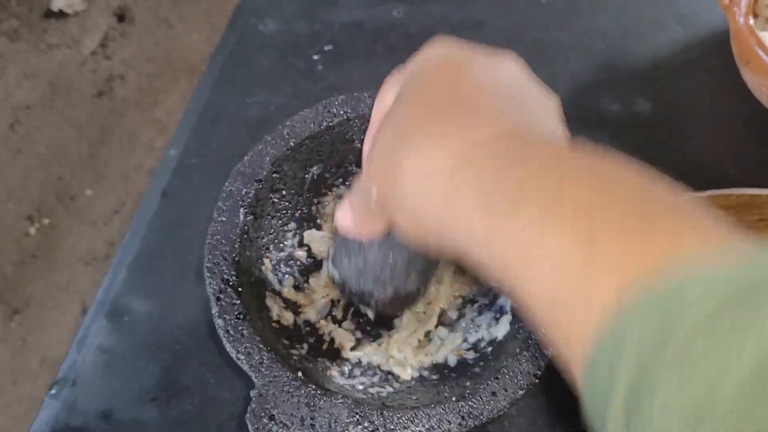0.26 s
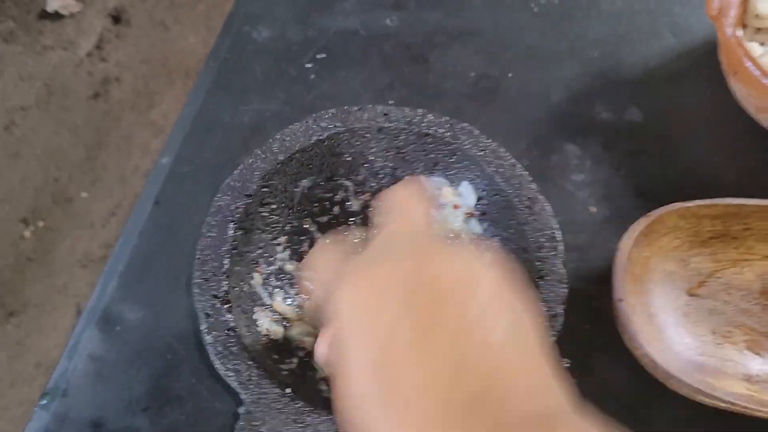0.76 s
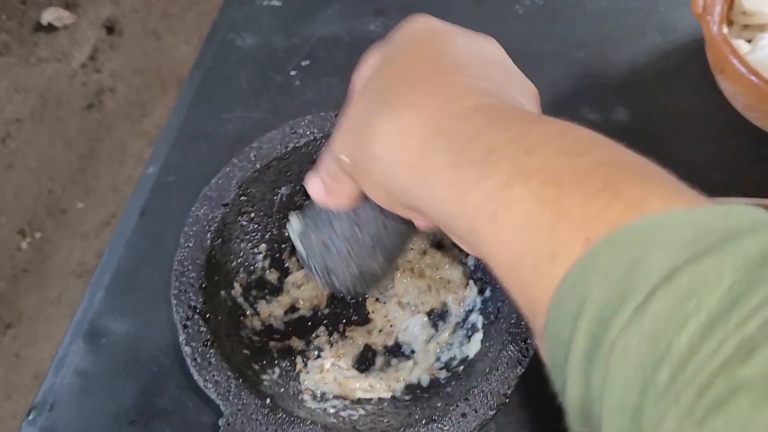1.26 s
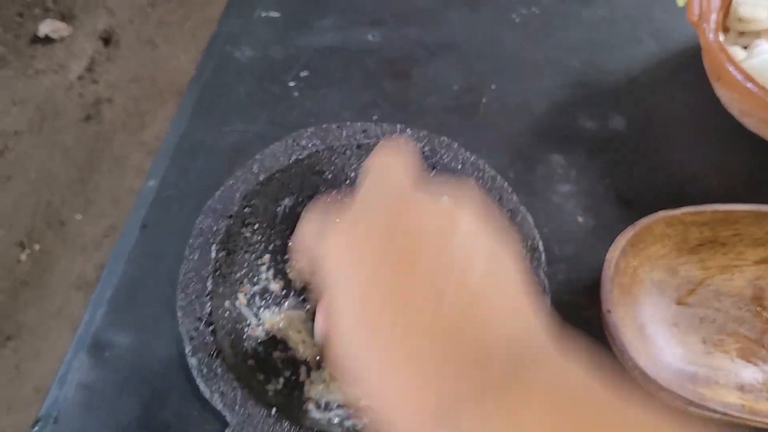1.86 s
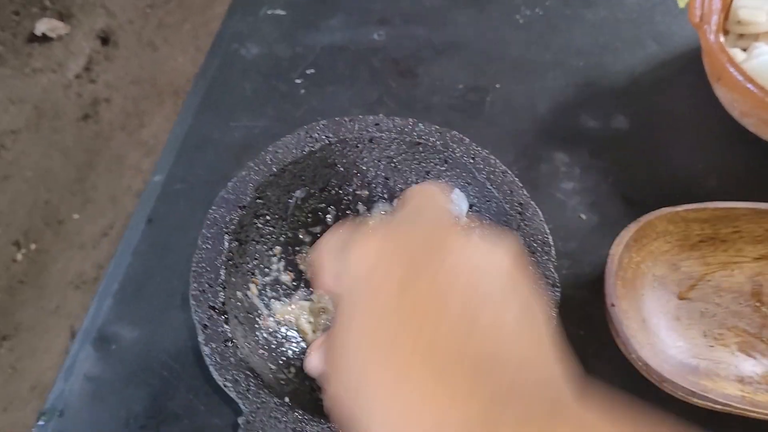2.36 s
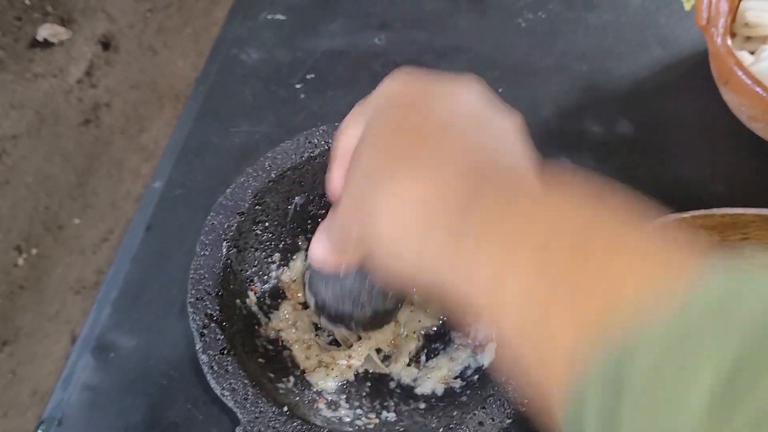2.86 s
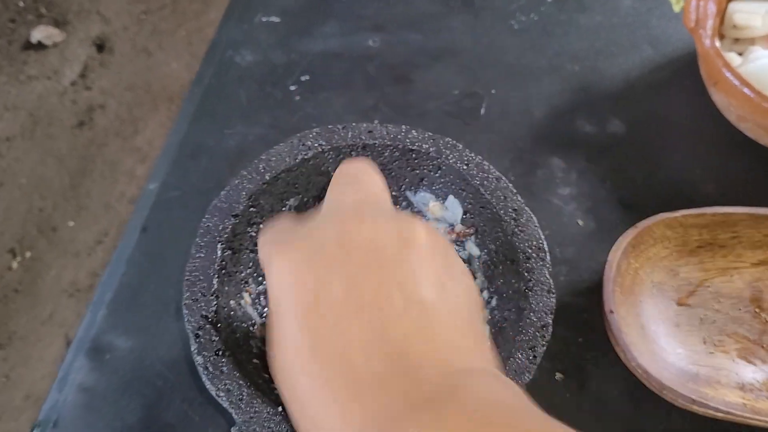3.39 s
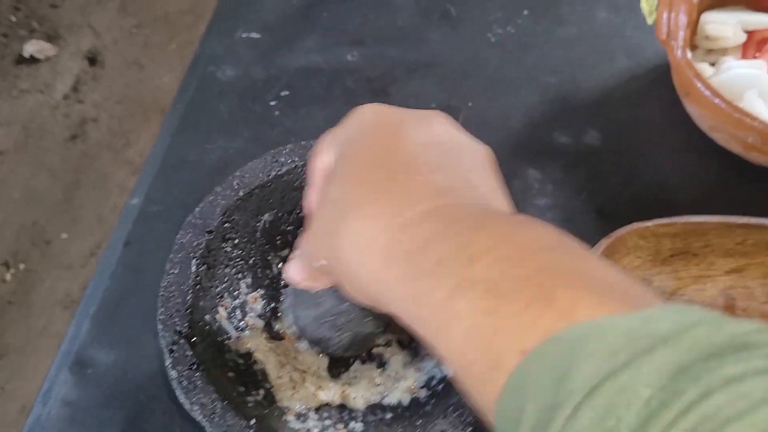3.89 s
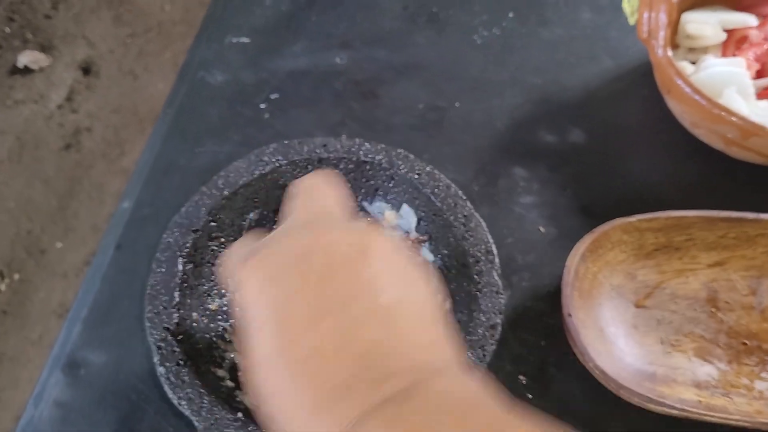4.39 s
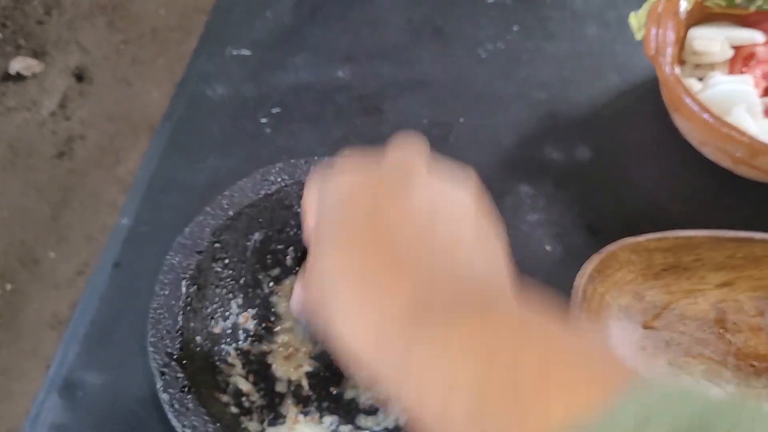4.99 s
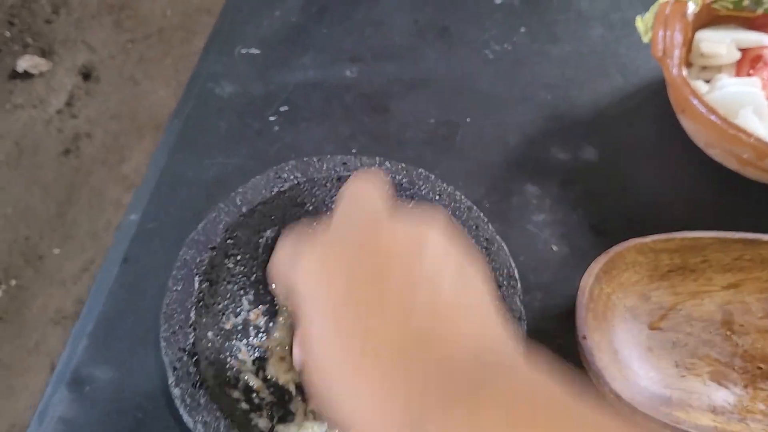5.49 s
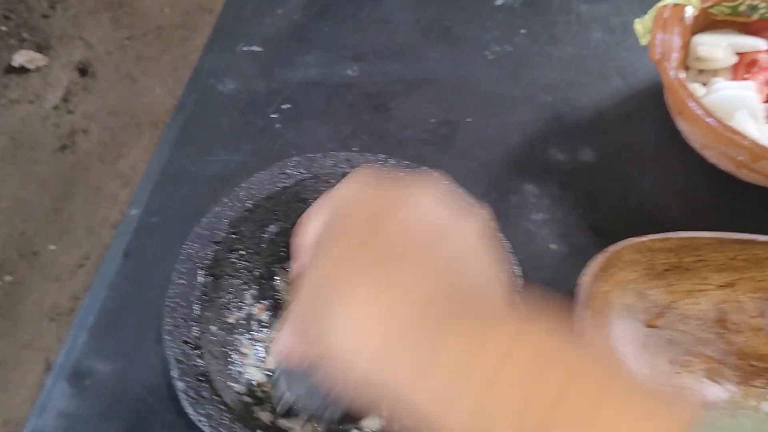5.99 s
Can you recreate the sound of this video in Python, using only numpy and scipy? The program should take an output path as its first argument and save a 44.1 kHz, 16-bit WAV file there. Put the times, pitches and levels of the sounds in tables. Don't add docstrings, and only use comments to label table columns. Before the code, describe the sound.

From 0 s a pestle drags lightly through wet paste, then lands hard at 0.1 with a hollow stone knock and table thump. Strokes continue every third of a second or so: knocks near 0.4, a soft one at 0.7, then 1.07, 1.35, 1.74 and 2.03, each followed by a short gritty rub that eases away. A strong blow at 2.4 thumps the table; more follow at 2.7, 3.06 and 3.4, with a duller push around 4.05, a firm knock at 4.35, others at 4.67, 5.0, 5.4 and 5.7, and a heavy one at 6.08. Small crunches and table rocking fill the gaps. Sticky smacks, crackles and tiny bright ticks accompany the strokes. Beneath lie soft low air, faint hiss and a continuous high cricket; a distant bird whistles faintly at 0.35, slides downward at 3.2, and again at 5.96. Close, dry stereo with a short tail.

```python
import sys
import numpy as np
from scipy import signal
from scipy.fft import rfft, irfft, next_fast_len
from scipy.io import wavfile
from scipy.ndimage import uniform_filter1d

SR = 44100
rng = np.random.default_rng(int(sys.argv[2]) if len(sys.argv) > 2 else 0)


def field_ratio(decibels):
    return 10 ** (np.asarray(decibels, dtype=float) / 20)


def log_audio(samples):
    frames = np.atleast_2d(samples).T
    limited = np.clip(frames, -1, 1)
    pcm = np.round(limited * 32767).astype(np.int16)
    wavfile.write(sys.argv[1], SR, pcm)


N = 275625


def evened(x):
    return x / np.sqrt(np.mean(x ** 2) + 1e-20)


def read(points, hz):
    f, value = np.transpose(points)
    return np.interp(np.log(hz + 1), np.log(f + 1), value)


def band(x, lo_hz, hi_hz, order=2):
    sos = signal.butter(order, [lo_hz, min(hi_hz, SR / 2.1)], "band", fs=SR, output="sos")
    return signal.sosfilt(sos, x)


def tilt(modes):
    return np.linspace(-1, 1, num=modes)[:, None]


# [f/Hz, level/dB per Hz]
AIR = [(15, -42.5), (25, 2), (128, -17), (178, -5), (331, -3.5), (698, -26.5), (1380, -26), (1730, -34.5),
       (3500, -54), (4550, -69), (7700, -120)]
# [f/Hz, level/dB per Hz]
HISS = [(1760, -30), (3000, 0), (8200, -5), (8870, -5), (14900, -8), (16200, -12), (16500, -39)]
# [f/Hz, likeness/1]
AIR_SAME = [(60, 0.75), (300, 0.83), (700, 0.72), (1400, 0.034), (16000, .01)]
AIR_DB, HISS_DB = -52.0, -75.5


def air(spectrum, level_db, patchy_db):
    frames, hz = N // 256 + 5, np.fft.rfftfreq(1024, 1 / SR)
    a, b, c, d, patches = rng.standard_normal((frames, 513, 5)).T
    patches = evened(uniform_filter1d(uniform_filter1d(patches, 12, 0), 14, 1))
    same = np.clip(read(AIR_SAME, hz), -1, 1)[:, None]
    left = a + 1j * b
    right = same * left + np.sqrt(1 - same ** 2) * (c + 1j * d)
    z = np.array([left, right]) * field_ratio(read(spectrum, hz)[:, None] + patchy_db * patches)
    wash = signal.istft(z, nperseg=1024, noverlap=768)[1][:, :N]
    return field_ratio(level_db) * evened(wash)


def whistle(hz, width_hz):
    r = np.exp(-np.pi * width_hz / SR)
    fuzz = signal.lfilter([1], [1, -2 * r, r * r], rng.standard_normal((2, 2, N)))
    carrier = np.exp(2j * np.pi * np.cumsum(hz * np.ones(N)) / SR)
    return evened(((fuzz[0] + 1j * fuzz[1]) * carrier).real)


CRICKET_HZ, CRICKET_DB, CRICKET_PER_S = 9120, -73.0, 38.3


def cricket():
    t = np.arange(N) / SR
    dip = np.clip(((CRICKET_PER_S * t) % 1 - .72) / 0.53, 0, 1)
    hz = CRICKET_HZ - 550. * dip
    line = np.sin(2 * np.pi * np.cumsum(hz) / SR) + 0.3 * whistle(hz - 120, 400)
    return field_ratio(CRICKET_DB - 10.5 * dip) * line


# [f/Hz, left level/dB, right level/dB, t60/s]
TOP_MODES = [(59.5, -29.5, -27.5, 0.31), (137.95, 0, 1.5, 0.14), (170.7, -8, -24.5, 0.17),
             (245.4, 0.5, 1.5, 0.058), (332.9, 4, 1, 0.063), (416.4, -2, -5.5, 0.11),
             (502, -9.5, -9.5, 0.039)]
BOWL_MODES = [(688, 4.5, 5, 0.004), (752, -14.5, -17, 0.041), (756, -2.5, 1.5, 0.025),
              (895, 9.5, 9.5, 0.0079), (989, 15, -9.5, 0.0034), (1369, 14.5, -26.5, 0.0081),
              (1436, 6, -8, 0.01)]
PESTLE_MODES = [(1720, 9.9, 1.3, 0.004), (2103, 3.5, 19.2, 0.0083), (2270, 12, 4, 0.022),
                (2643, 22.6, 22, 0.016), (2897, 23.5, 22.7, 0.011), (2940, 12, 7.9, 0.0077),
                (3350, 8, 18, 0.0074)]
HARD_S = .0003


def rings(modes, contact_s, step):
    t = np.arange(9000) / SR
    hz, left_db, right_db, t60 = np.transpose(modes)[:, :, None]
    sign = step ** np.maximum(np.arange(len(modes)), 1)[:, None]
    ring = sign * field_ratio(-60 * t / t60) * np.sin(2 * np.pi * hz * t)
    u = np.clip(np.arange(400) / SR / contact_s, 0, 1)
    push = np.sin(np.pi * u)[None] ** 2
    ring = signal.fftconvolve(ring, push, axes=1)[:, :len(t)]
    pair = np.array([field_ratio(left_db) * ring, field_ratio(right_db) * ring])
    return pair / abs(pair.sum(1).mean(0)).max()


def strike(forces, modes, contact_s):
    step = 1. if modes[0][0] < SR / 100 else -1.
    pair, length = rings(modes, contact_s, step), forces.shape[1]
    size = next_fast_len(length + pair.shape[2])
    return irfft((rfft(forces, size) * rfft(pair, size)).sum(1), size)[:, :length]


def land(s, db, spot_db):
    forces = np.zeros((len(db), N))
    spot = spot_db * rng.standard_normal(db.shape[::-1]).T
    forces[:, np.round(s * SR).astype(int)] = field_ratio(db + spot)
    return forces


# [t/s, length/s, pressure/dB, grit share/dB, wet paste/dB]
STROKES = [(0, 0.15, -54, -16.5, -58.5), (0.108, .17, -27, -3.5, -55), (0.403, 0.11, -17, -13.5, -58.5),
           (0.725, 0.17, -38, -16.5, -57), (1.081, 0.22, -29, -6.5, -60.5), (1.348, 0.28, -26, -14, -59),
           (1.718, 0.23, -28.5, -7, -57), (2.054, 0.18, -24.5, -8, -55), (2.418, 0.13, -27, -1.5, -59.5),
           (2.7, 0.36, -35, -7.5, -56.5), (3.036, 0.23, -30.5, -19, -60.5), (3.374, 0.14, -34, -3.5, -54.5),
           (3.693, 0.19, -39, -12.5, -62), (4.076, 0.12, -20.5, -19.5, -56.5), (4.36, 0.15, -21, -8, -56),
           (4.662, 0.18, -27, -20, -58.5), (4.969, 0.18, -29.5, -2.5, -53.5),
           (5.375, 0.26, -26.5, -14, -56), (5.733, 0.21, -23, -14, -56), (6.07, 0.22, -23.5, -10, -54.5)]
EASE_DB, EASE_SHAPE, LIFT_DB_PER_S = -44, 2.23, 143.5
SMOOTH_DB_PER_S, DRAIN_DB_PER_S, PEEL_DB_PER_S = 60, 22.5, 156


def strokes():
    t = np.arange(N) / SR
    current = np.searchsorted([row[0] for row in STROKES[1:]], t)
    s, length, press_db, grit_db, wet_db = np.array(STROKES)[current].T
    since = np.maximum(t - s, 0)
    lifted = np.maximum(since - length, 0)
    ease = np.minimum(since / length, 1) ** EASE_SHAPE
    pressure_db = press_db + (EASE_DB - press_db) * ease - LIFT_DB_PER_S * lifted
    grit_db = grit_db - SMOOTH_DB_PER_S * since
    wet_db = wet_db - DRAIN_DB_PER_S * since - PEEL_DB_PER_S * lifted
    return uniform_filter1d([pressure_db, grit_db, wet_db], size=400, axis=1)


def grit(per_s, spread_db, count):
    size = field_ratio(spread_db * np.minimum(rng.exponential(1, N), 3.6)) * rng.choice([-1, 1], N)
    hits = size * (rng.random(N) < per_s / SR)
    return hits * rng.uniform(0.22, 0.29, (count, N))


def drag():
    pressure_db, grit_db, wet_db = strokes()
    stone = np.zeros((2, N))
    # modes, impacts/s, spread/dB, contact/s, level/dB
    layers = [(TOP_MODES, 160, 2.4, .004, pressure_db - 3.5),
              (BOWL_MODES, 450, 4.2, .0007, pressure_db + grit_db - 10.0),
              (PESTLE_MODES, 500, 4.6, HARD_S, pressure_db + grit_db - 24.5)]
    for modes, per_s, spread_db, contact_s, db in layers:
        hits = grit(per_s, spread_db, count=7)
        unit = np.std(strike(hits[:, :SR], modes, contact_s))
        stone += strike(hits * field_ratio(db), modes, contact_s) / unit
    puff = field_ratio(-60 * np.arange(400) / SR / 0.018)[None]
    puffs = signal.oaconvolve(abs(grit(660, 7.4, count=2)), puff, axes=1)[:, :N]
    spatter = evened(puffs * rng.standard_normal((2, N)))
    surge = evened(uniform_filter1d(uniform_filter1d(rng.standard_normal(N), 700), 700))
    fizz = (spatter + 2.0 * rng.standard_normal((2, N))) * field_ratio(3.2 * surge)
    return stone, field_ratio(wet_db - 1.0) * evened(band(fizz, 1800, 7000, order=1))


# [t/s, level/dB, lean to the higher modes/dB]
CHIPS = [(0.043, -46, 2), (0.077, -52, -5), (0.127, -39, 0), (0.433, -36.5, -3), (0.605, -45.5, 2.5),
         (0.763, -46, 11), (0.814, -35, 2), (0.919, -59.5, -10), (1.032, -63.5, 3.5), (1.081, -12, 4),
         (1.102, -37, 4.5), (1.11, -25.5, -5), (1.35, -28.5, -2), (1.375, -28, -1), (1.42, -45, -1),
         (1.573, -47.5, -1), (1.714, -48, 8), (1.752, -32, -3), (2.412, -26, 5), (2.557, -45, -3.5),
         (2.719, -28, -10), (2.811, -42, -1), (2.946, -45, 4), (3.393, -10, -12), (3.787, -51.5, -1),
         (3.83, -41, -2), (3.896, -55, -2), (3.918, -44.5, -6), (4.015, -61.5, 1), (4.083, -44, -2.5),
         (4.198, -43, 4), (4.379, -14, 0), (4.435, -29, 2), (4.524, -48.5, 3), (4.754, -32.5, -3),
         (4.832, -47, 11), (4.859, -48, 6), (5.19, -53.5, -1), (5.247, -40, -0.5), (5.301, -60, 0),
         (5.34, -47, 3), (5.38, -46, 8), (5.589, -40.5, -12.5), (5.769, -31, 1), (5.924, -48, 6.5),
         (5.979, -42.5, 3), (6.023, -57, -12), (6.046, -51, -7.5), (6.097, -12, -6), (6.152, -22, 4)]
# [t/s, level/dB, lean to the higher modes/dB]
JOLTS = [(0.114, -5.5, 8), (0.341, -53, -3), (0.397, -30, 7), (0.42, -14, -9.5), (0.639, -39.5, -2.5),
         (0.733, -34.5, -7), (0.774, -33.5, -1), (0.855, -40, 3.5), (0.916, -34.5, 4.5), (0.989, -52.5, 2),
         (1.07, -11, -7.5), (1.082, -21, -12), (1.12, -13, -7), (1.155, -19.5, -7), (1.358, -15, -3),
         (1.574, -42.5, 0.5), (1.612, -40, -2.5), (1.711, -41, -1), (1.741, -26.5, 7), (2.031, -28.5, -1),
         (2.16, -30, 2.5), (2.19, -47, -8), (2.315, -45, 2), (2.401, -5.5, 1), (2.517, -38, 14),
         (2.553, -38, 2), (2.704, -25.5, 7), (3.003, -57, 0), (3.054, -29, 8), (3.099, -26, -8),
         (3.239, -34, 12), (3.362, -23.5, -5), (3.385, -18.5, 3.5), (3.44, -27, -6), (3.526, -48.5, 3),
         (3.613, -47.5, 1), (4.05, -5.5, -5), (4.102, -19.5, 4.5), (4.353, -4.5, -0.5), (4.376, -15, 2.5),
         (4.669, -28.5, -4), (4.979, -22.5, -4.5), (5.006, -15, -9.5), (5.024, -17, 4), (5.059, -20, 2),
         (5.137, -43, -2), (5.247, -30, 9), (5.383, -47.5, -5), (5.448, -24, -1), (5.716, -29, 8.5),
         (5.828, -20, 3), (5.851, -20, 2), (6.045, -43.5, -1), (6.079, -7, 10), (6.144, -20, -5)]


def chips():
    s, db, lean_db = np.transpose(CHIPS)
    bowl = strike(land(s, db - 5.0 + tilt(7) * lean_db, spot_db=5.5), BOWL_MODES, 0.0007)
    s, db, lean_db = np.transpose(JOLTS)
    top = strike(land(s, db - 6.5 + tilt(4) * lean_db, spot_db=1.5), TOP_MODES[-4:], 0.0019)
    return band(bowl + top, 99, 2200, order=3)


# [t/s, level/dB, centre f/Hz]
POPS = [(0.1147, -23, 3960), (0.3972, -36.5, 3870), (0.544, -43, 4960), (0.5797, -40.5, 4680),
        (1.067, -37, 7300), (1.4065, -34.5, 4650), (1.502, -45.5, 4410), (1.737, -34, 4470),
        (1.8776, -41.5, 5500), (1.948, -48, 5100), (2.0273, -36.5, 5000), (2.1102, -36.5, 4450),
        (2.3999, -34.5, 5730), (2.588, -35, 4100), (2.7037, -32.5, 4420), (2.793, -43.5, 4080),
        (2.8586, -38.5, 3840), (3.2228, -40.5, 5000), (3.401, -35, 10000), (3.828, -36, 6800),
        (3.851, -42.5, 13300), (4.351, -31, 4630), (4.378, -33, 5160), (4.51, -38.5, 3870),
        (4.974, -27, 4940), (5.137, -36.5, 4320), (5.197, -45, 3680), (5.231, -37, 4050),
        (5.2509, -39.5, 5870), (6.08, -32.5, 9100)]
# [t/s, level/dB, centre f/Hz]
TEARS = [(0.4212, -30.5, 5300), (0.745, -46, 5300), (0.842, -48, 4200), (0.856, -39.5, 5570),
         (1.1593, -41.5, 3770), (1.716, -40.5, 4730), (1.7904, -44.5, 7000), (2.19, -47, 4820),
         (2.238, -49.5, 4760), (2.5163, -37, 5340), (3.3836, -56, 5100), (3.755, -47, 5300),
         (4.0466, -38.5, 4200), (4.4682, -42.5, 5700), (4.542, -41, 5000), (4.6615, -37, 5700),
         (4.8288, -46, 5460), (4.868, -45.5, 4980), (5.375, -39, 5700), (5.7164, -37, 5330),
         (5.7576, -44, 6260), (1.387, -47, 6500), (1.418, -41, 5400), (1.433, -49, 5170),
         (3.413, -29.5, 4900), (1.211, -50.5, 5240), (1.239, -61, 4300), (3.87, -43, 3350),
         (3.529, -54.5, 4220)]
POP_EDGE_DB, TEAR_EDGE_DB = -26, 24


def smacks():
    out, t = np.zeros((2, N + 3000)), np.arange(3000) / SR
    rows = [(*row, POP_EDGE_DB) for row in POPS] + [(*row, TEAR_EDGE_DB) for row in TEARS]
    chance = zip(rng.standard_normal((len(rows), 2, 3000)), rng.exponential(1, (len(rows), 100)))
    for (s, db, hz, bright_db), (noise, bubbles) in zip(rows, chance):
        crackle = field_ratio(3.5 * np.repeat(bubbles, 30))
        burst = noise * crackle * np.minimum(t / 0.0015, 1) * field_ratio(-60 * t / 0.012)
        edge = field_ratio(bright_db - 38.0) * band(burst, 6300, 14000)
        burst = band(burst, max(0.7 * hz, 2800), 1.35 * hz) + edge
        out[:, round(s * SR):][:, :3000] += field_ratio(db + 3.5) * burst / abs(burst).max()
    return out[:, :N]


# [t/s, level/dB, centre f/Hz]
TICKS = [(0.115, -37, 11800), (0.1316, -44.5, 10800), (0.2783, -39, 11800), (0.398, -36, 10000),
         (0.4195, -29, 10530), (0.7532, -40, 14700), (0.8444, -52, 10900), (0.855, -30, 11700),
         (0.872, -31, 12200), (1.065, -32.5, 10500), (1.153, -36.5, 12000), (1.1648, -31, 12500),
         (1.3793, -44, 13700), (1.5219, -47, 14500), (1.715, -36, 13800), (1.736, -48, 13700),
         (1.8502, -51, 11400), (2.0283, -50, 12370), (2.191, -43, 11300), (2.237, -45.5, 12650),
         (2.3984, -27, 12000), (2.5002, -34.5, 10200), (2.5167, -45, 13500), (2.589, -36.5, 11500),
         (2.7038, -48.5, 9900), (2.9714, -64, 9800), (3.2061, -55, 10450), (3.224, -48.5, 12500),
         (3.3413, -59, 11400), (3.3603, -40, 12100), (3.4017, -40, 11000), (3.617, -59, 12970),
         (3.6448, -64.5, 12200), (3.69, -55, 13800), (3.7115, -57, 14400), (3.7469, -55, 13800),
         (3.7569, -40, 12700), (3.7734, -47, 14900), (3.8287, -36.5, 11560), (3.8454, -40, 12800),
         (3.8525, -23.5, 15000), (3.8566, -32, 13100), (4.0462, -40.5, 11300), (4.3515, -39, 14500),
         (4.377, -43, 9990), (4.4697, -45, 14000), (4.5423, -33.5, 11640), (4.66, -37, 14650),
         (4.8389, -44, 10700), (4.9736, -46, 10700), (5.2535, -38.5, 14800), (5.3732, -46, 12500),
         (5.718, -36, 11700), (5.758, -38, 11000), (6.0807, -23.5, 10000)]


def ticks():
    out, t = np.zeros((2, N + 600)), np.arange(600) / SR
    for (s, db, hz), noise in zip(TICKS, rng.standard_normal((len(TICKS), 600))):
        burst = band(noise * field_ratio(-60 * t / 0.0016), 0.5 * hz, 1.5 * hz)
        out[:, round(s * SR):][:, :600] += field_ratio(db - 9.0) * burst / abs(burst).max()
    return out[:, :N]


# [t/s, blow level/dB, pestle share/dB, lean to the left/dB, table thump/dB]
KNOCKS = [(0.116, -11, -5, 12, -3.5), (0.399, -8.5, -11, 2.5, -29), (0.4208, -5.5, -45, 0, -14),
          (0.727, -52.5, -0.5, 13.5, -62), (1.07, -17, -35, -6, -20), (1.074, -14, -35, 0.5, -15.5),
          (1.335, -26, -14.5, 11, -30), (1.74, -12.5, -46.5, -2, -9), (2.03, -28.5, -25, 5, -26),
          (2.401, -5.5, -19, 7, -0.5), (2.706, -10.5, -19, 2, -14.5), (3.059, -26.5, -33.5, -4, -17.5),
          (3.362, -23.5, -17, 8.5, -26), (3.384, -14.5, -27.5, 0, -17.5), (4.052, -31.5, -43.5, 2, -5),
          (4.352, -12.5, -10.5, -2.5, -2.5), (4.404, -22, -28, 7.5, -27), (4.668, -35.5, -23, 5, -5),
          (4.974, -26.5, -6.5, 15.5, -26), (5.021, -21, -47, -5, -12), (5.449, -16.5, -48, -2.5, -11.5),
          (5.719, -10.5, -17, 5.5, -13), (6.081, -6, -16, 3, -1.5), (6.143, -13.5, -56, -2.5, -7.5)]
# [t/s, blow level/dB, lean to the left/dB]
CRUNCHES = [(0.801, -31, -1.5), (0.847, -39, 4), (0.887, -55.5, 19.5), (1.12, -15, -1), (1.159, -39.5, -16),
            (1.415, -41.5, 13), (1.497, -53, 14.5), (1.919, -46.5, -9.5), (2.079, -25.5, -7.5),
            (2.112, -26.5, -2), (2.159, -36.5, -12.5), (2.587, -45, 5), (2.894, -55, -2), (2.969, -38, 1.5),
            (3.083, -40, -19.5), (3.1, -21.5, 5), (3.24, -42.5, 6.5), (4.105, -22, 2), (4.712, -57, -19.5),
            (4.745, -39, 0), (4.778, -37.5, -12), (4.989, -16, 3), (5.009, -19.5, 5), (5.394, -29, 0),
            (5.491, -29, 2), (5.509, -39, -16.5), (5.623, -39.5, 2.5), (5.795, -21, -8.5), (5.829, -15, -2),
            (5.853, -34.5, -14.5)]
LUMP_S = 0.00095
LUMP_DB, LUMP_SLOPE = -72, -1.19
REBOUND_S, REBOUND_DB = 0.011, -6


def blows():
    crunches = [(s, db, LUMP_DB + LUMP_SLOPE * db, lean_db) for s, db, lean_db in CRUNCHES]
    s, db, pestle_db, lean_db = np.transpose([row[:-1] for row in KNOCKS] + crunches)
    lean = tilt(7) * lean_db
    pushes_db, count = db + 1.46 * lean - .1, len(KNOCKS)
    bowl = strike(land(s[:count], pushes_db[:, :count], spot_db=2), BOWL_MODES, 0.00043)
    bowl = bowl + strike(land(s[count:], pushes_db[:, count:], spot_db=3), BOWL_MODES, LUMP_S)
    dull = 1 + 0.63 * tilt(7)
    hard_db = db + dull * pestle_db + 11.0
    upper = np.arange(7)[:, None] > 1
    first = land(s, hard_db, spot_db=4.0)
    skip = upper * land(s + REBOUND_S, hard_db + REBOUND_DB, spot_db=7.5)
    return bowl + strike(first + skip, PESTLE_MODES, HARD_S)


# [t/s, thump level/dB]
ROCKS = [(0.554, -33), (0.772, -36), (0.849, -24.5), (0.897, -51), (1.122, -12), (1.154, -5.5),
         (1.199, -19), (1.394, -22), (1.575, -27.5), (1.892, -31), (2.077, -3.5), (2.121, -8.5),
         (2.268, -43), (2.516, -10), (2.751, -11), (2.891, -18), (3.12, -8), (3.236, -32), (3.438, -43),
         (3.702, -35), (3.833, -18), (4.102, -18.5), (4.42, -33), (4.743, -9), (5.074, -17), (5.241, -30.5),
         (5.375, -19), (5.621, -22.5), (5.772, -10), (5.833, -11)]
KNOCK_UPPER_DB, BY_BLOW, BY_THUMP = -6, 0.23, 0.92
ROCK_UPPER_DB, BY_ROCK = -25.5, 0.54


def thumps():
    s, blow_db, _, _, db = np.transpose(KNOCKS)
    rock_s, rock_db = np.transpose(ROCKS)
    knock_upper_db = KNOCK_UPPER_DB + BY_BLOW * blow_db + BY_THUMP * db
    upper_db = np.r_[knock_upper_db, ROCK_UPPER_DB + BY_ROCK * rock_db]
    upper = (np.arange(7) > 2)[:, None]
    shares_db = np.where(upper, upper_db + 7.5, np.r_[db, rock_db])
    pushes = land(np.r_[s + .0012, rock_s + .0005], shares_db, spot_db=4.0)
    return band(strike(pushes, TOP_MODES, 0.002), 120, 4300)


# [bend t/s, lead/s, tail/s, level/dB]
BIRDCALLS = [
    (0.349, 0.05, 0.05, -67),
    (3.182, 0.28, 0.19, -63.5),
    (5.96, 0.029, 0.104, -65.5),
]
# [t from bend/s, f/Hz, level/dB]
SLIDE = [
    (-.3, 7100, -5),
    (-.15, 7600, -8),
    (0, 7540, -3),
    (.04, 7250, -1),
    (0.064, 6300, 4.5),
    (0.088, 5280, 2.5),
    (.18, 5230, -5),
]
BIRD_FADE_DB_PER_S, BIRD_WIDTH_HZ = 397, 750


def bird():
    t = np.arange(N) / SR
    calls = np.array(BIRDCALLS)
    nearest = abs(t[:, None] - calls[:, 0]).argmin(1)
    bend, lead, after, db = calls[nearest].T
    s, hz, swell_db = np.transpose(SLIDE)
    outside = np.maximum(np.maximum(bend - lead - t, t - bend - after), 0)
    voice = whistle(np.interp(t - bend, s, hz), BIRD_WIDTH_HZ)
    return field_ratio(db + np.interp(t - bend, s, swell_db) - BIRD_FADE_DB_PER_S * outside) * voice


# [f/Hz, t60/s]
ROOM = [(600, 0.23), (1300, 0.2), (2200, 0.3), (2720, 0.29), (3150, 0.3), (6000, 0.25), (12000, 0.12)]
# [t/s, left level/dB, right level/dB]
ECHOES = [(.0045, -29, -13)]


def tail():
    taps = np.zeros((2, SR // 2))
    at = np.arange(200, SR // 2 - 20, 20) + rng.integers(0, 20, (2, (SR // 2 - 201) // 20))
    np.put_along_axis(taps, at, rng.choice([-1., 1.], at.shape), 1)
    hz, t, z = signal.stft(taps, SR, nperseg=256)
    out = signal.istft(z * field_ratio(-60 * t / read(ROOM, hz)[:, None]), SR, nperseg=256)[1]
    out *= field_ratio(-10.0) / np.linalg.norm(out[0])
    for s, left_db, right_db in ECHOES:
        out[:, round(s * SR)] += field_ratio([left_db, right_db])
    return out


def room(x):
    turn = 2 * np.pi * 1.3 * np.arange(N) / SR
    sent = band(x, 620, 16000, order=4)
    shares = (np.sin(turn), np.cos(turn))
    return sum(signal.fftconvolve(sent * share, tail(), axes=1)[:, :N] for share in shares)


# [f/Hz, left minus right/dB]
PORTS = [(3500, -5.5), (6000, 3.5), (9000, -13), (15000, -35)]


def hand_shaded(bursts, fizz):
    shade_db = read(PORTS, np.fft.rfftfreq(N, 1 / SR)) * np.array([[.5], [-.5]])
    return irfft(rfft(bursts) * field_ratio(shade_db) + rfft(fizz) * field_ratio(0.15 * shade_db), N)


# [f/Hz, left minus right/dB, left lag/rad]
PORT_SPLIT = [(60, 0.5, .12), (150, 0, 0), (290, 0, -.35), (550, -4, .2), (800, -6, -.2), (1350, 4, .8),
              (1900, 4, .5), (2600, 2, -.6)]
# [from f/Hz, to f/Hz, share taken out/1]
STILL = [(73.5, 92.4, 1), (182.8, 216, 0.51)]


def port_split(x):
    x = x - sum(share * band(x, lo, hi, order=1) for lo, hi, share in STILL)
    hz, half = np.fft.rfftfreq(N, 1 / SR), np.array([[.5], [-.5]])
    level_db = half * read([(f, db) for f, db, _ in PORT_SPLIT], hz)
    lag_rad = half * read([(f, rad) for f, _, rad in PORT_SPLIT], hz)
    return irfft(rfft(x) * field_ratio(level_db) * np.exp(-1j * lag_rad), N)


LEFT_LAG = 12


def scene():
    stone, fizz = drag()
    stone = band(stone + blows() + thumps(), 20, 3300, order=3)
    paste = hand_shaded(smacks() + ticks(), fizz)
    near = port_split(stone + chips()) + paste
    near = np.array([np.roll(near[0], LEFT_LAG), near[1]])
    near = near + room(near)
    garden = cricket() + bird()
    return near + garden + air(AIR, AIR_DB, patchy_db=5.0) + air(HISS, HISS_DB, patchy_db=0)


def top_cut(x):
    return signal.sosfilt(signal.butter(12, 16990, fs=SR, output="sos"), x)


def record(dry):
    edge = signal.firwin(255, 15950, window=("kaiser", 5), fs=SR)
    heard = signal.oaconvolve(band(dry, 53, 20000, order=4), edge[None], "same", axes=1)
    return top_cut(np.clip(heard, -.99, .99))


dry = scene()
out = record(dry)
log_audio(out)
```